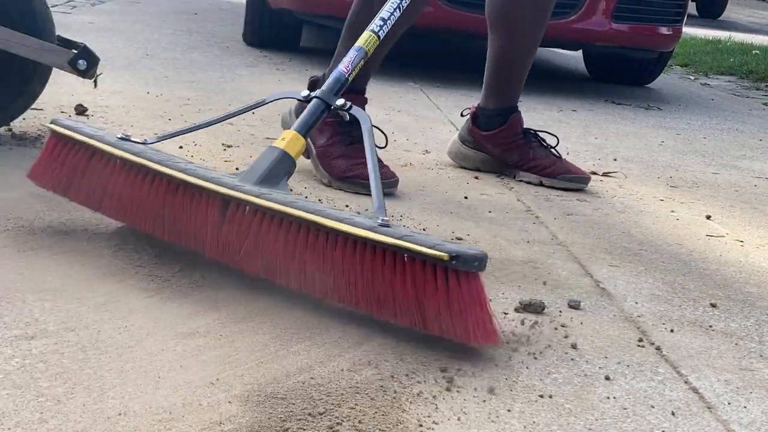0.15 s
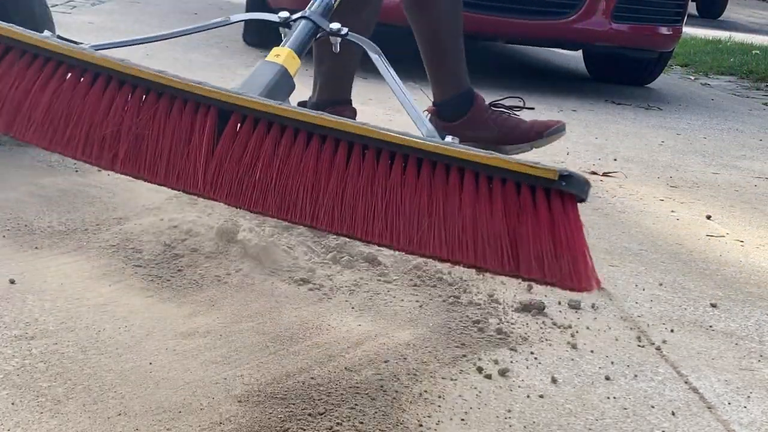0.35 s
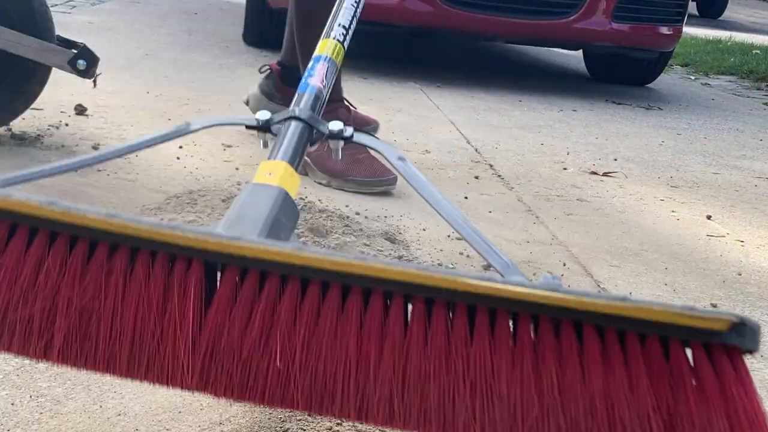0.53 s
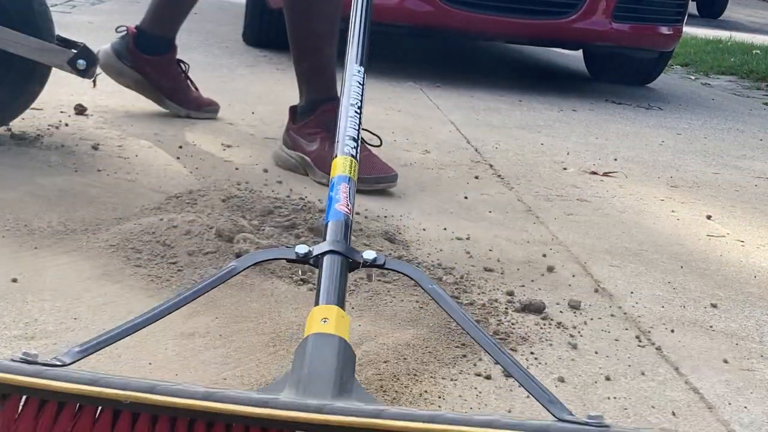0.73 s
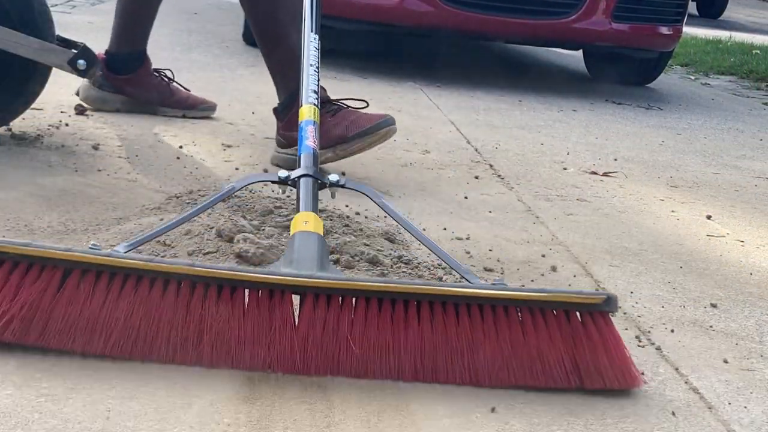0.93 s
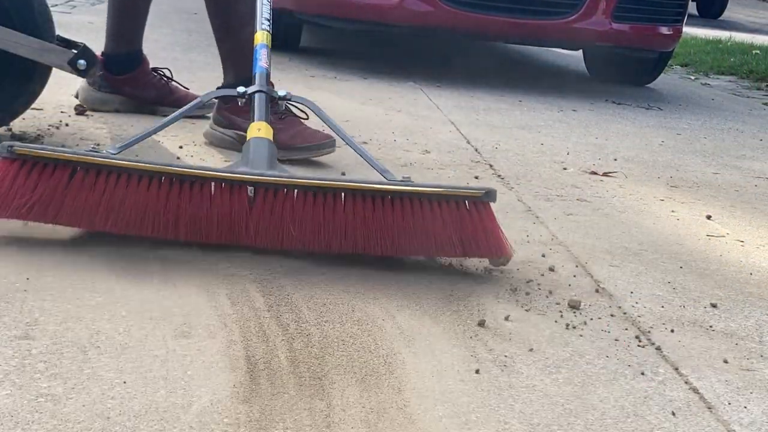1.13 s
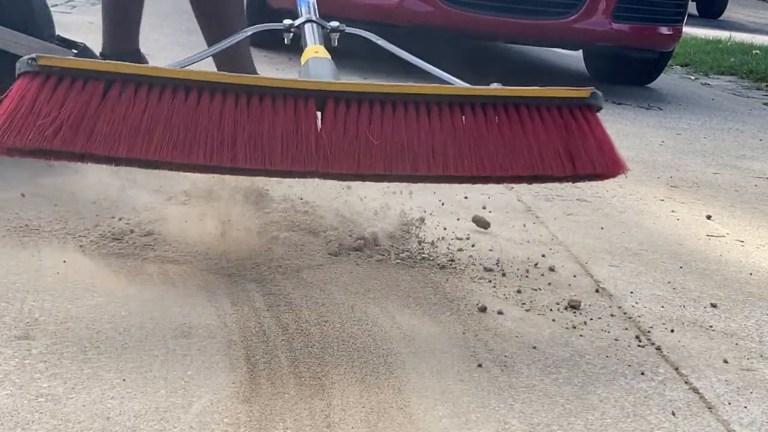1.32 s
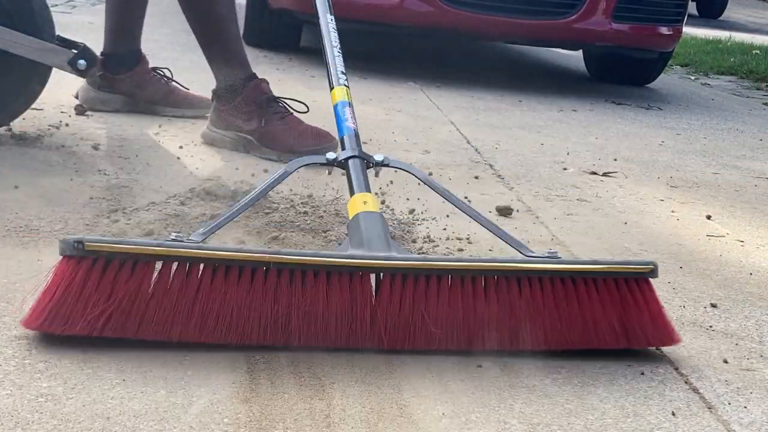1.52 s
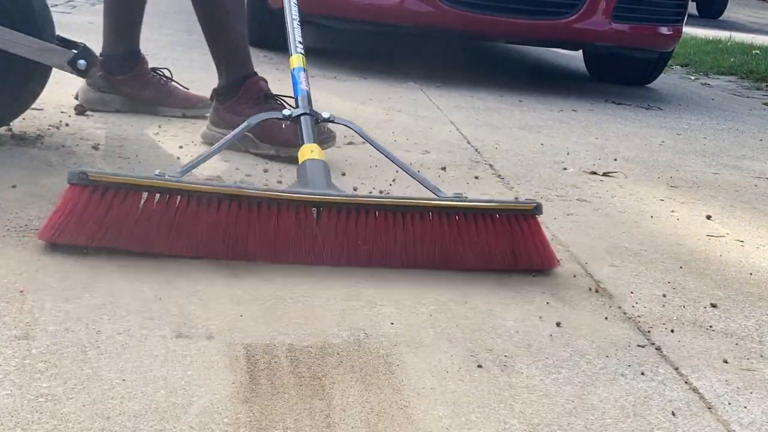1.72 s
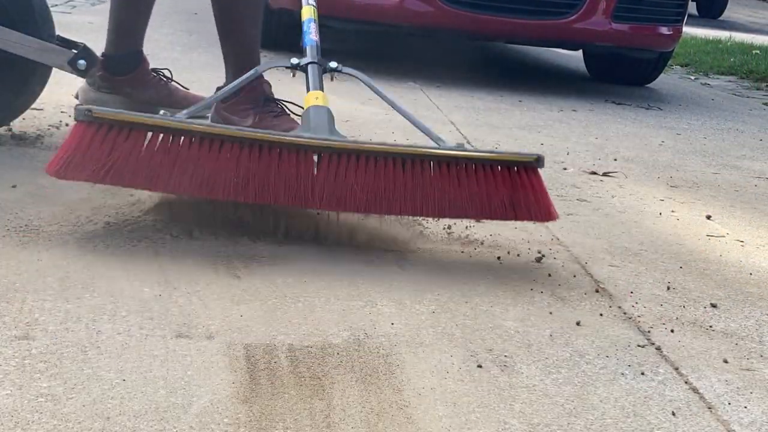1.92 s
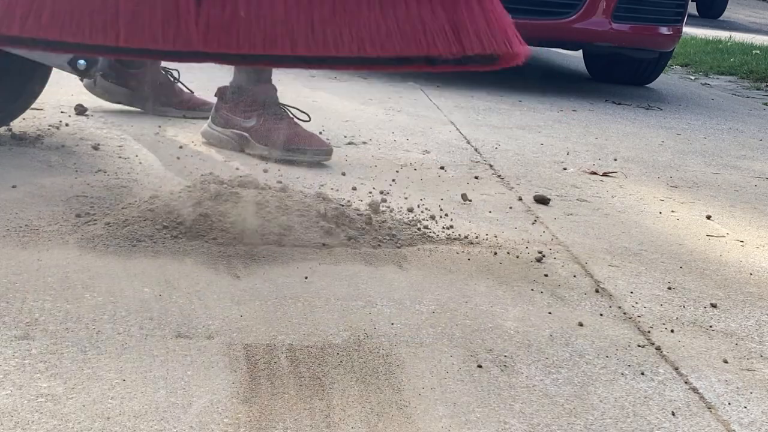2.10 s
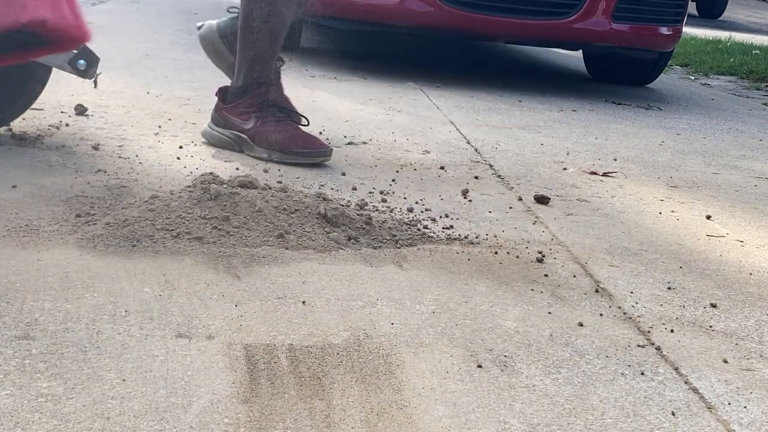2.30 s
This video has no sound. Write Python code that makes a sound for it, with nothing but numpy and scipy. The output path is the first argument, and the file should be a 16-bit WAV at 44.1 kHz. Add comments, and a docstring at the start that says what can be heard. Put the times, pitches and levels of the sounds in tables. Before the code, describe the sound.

A stiff push broom sweeps gritty soil on concrete, close up: a fading stroke end, then two slap-and-scrape strokes, with light soil patter, tiny pebble ticks and faint distant traffic outdoors, in close stereo.

```python
"""On a concrete driveway a stiff push broom sweeps soil: the end of one stroke, then two whole ones.
Bristle friction is dense random impulses shaped by a spectrum, with short rings of single bristles.
Each landing is a noise slap, decaying modes of the head and a low thud; flung soil is sparser impulses.
Shoes scuff, pebbles tick as brief damped modes, and distant traffic is shaped noise with a far whir
and a whistle. Two close microphone ports hear it, with a faint answer from the surroundings."""
import sys
import numpy as np
from scipy import signal
from scipy.fft import rfft, irfft, next_fast_len
from scipy.io import wavfile
from scipy.ndimage import uniform_filter1d, map_coordinates

SR = 44100
rng = np.random.default_rng(int(sys.argv[2]) if len(sys.argv) > 2 else 0)


def inscribe(sig):
    """Save sig as 16-bit PCM at rate SR to the path in sys.argv[1].

    A 1-D sig is mono; a 2-D sig holds one channel per row.
    Samples are clipped to [-1, 1] before scaling.
    """
    pcm = np.round(np.clip(np.atleast_2d(sig).T, -1, 1) * 32767)
    wavfile.write(sys.argv[1], SR, pcm.astype(np.int16))


N = 103811

# Push of the broom, one list per stroke: time_s, level_db
PUSH_STROKES = [
    [(0, -33.5), (.03, -36.5), (.076, -38), (.115, -51.5), (.17, -63.5), (.2, -90)],
    [(.695, -47.5), (.708, -45), (.725, -51), (.757, -45), (.778, -49.5), (.81, -31), (.83, -28),
     (.864, -33.5), (.9, -30.5), (1.0, -33.5), (1.074, -34), (1.1, -37.5), (1.13, -55), (1.22, -67),
     (1.25, -90)],
    [(1.597, -42.5), (1.612, -43), (1.632, -35), (1.68, -34), (1.718, -32.5), (1.792, -37), (1.805, -43.5),
     (1.87, -55.5), (1.96, -75)],
]
# Spectrum of bristles on concrete: frequency_hz, relative_level_db_per_hz
BRISTLE_SPECTRUM = [(88, -37.5), (150, -16), (189, -10.5), (303, -5), (369, -11), (487, -8.5), (520, -15.5),
                    (644, -10.5), (734, -8.5), (938, -3), (1260, -9.5), (1610, -2), (2200, -5), (2590, -12),
                    (3250, -3.5), (4160, -5), (4820, -2.5), (5680, 0), (7500, -7), (9750, -30.5),
                    (16500, -120)]
# Spectrum of fine sand: frequency_hz, relative_level_db_per_hz
SAND_SPECTRUM = [(3000, -37.5), (4500, -29), (6500, -8.5), (8200, 0), (9600, 1), (11000, 0), (12200, 0),
                 (13800, -5.5), (15700, -6)]
# Likeness of left and right for broom, soil and shoes: frequency_hz, correlation (no unit)
BROOM_ALIKE = [(100, 0.92), (900, 0.97), (1350, 0.66), (1900, 1), (5500, 0.83), (7300, 1), (9500, 0.94),
               (15000, 1)]
# Spectrum of the street: frequency_hz, relative_level_db_per_hz
STREET_SPECTRUM = [(15, -40), (28, -28.5), (40, -12), (62, -3.5), (100, -7), (160, -13.5), (330, -21.5),
                   (650, -31), (1000, -34), (1800, -36.5), (2700, -42), (6000, -43), (8000, -48.5),
                   (11000, -59), (13000, -62.5), (15500, -72)]
# Likeness of left and right for the street: frequency_hz, correlation (no unit)
STREET_ALIKE = [(60, 1), (130, 0.9), (300, 0.74), (640, 0.1), (1400, 0.47), (3000, 0.92), (12000, 0.75)]
# A far, airy whistle rises: time_s, pitch_hz, level_db
WHISTLE_PATH = [(1.941, 2000, -90), (2.0, 2150, -73.5), (2.06, 2350, -73.5), (2.17, 2560, -74),
                (2.3, 2960, -89.5)]
# Flung soil lands: peak_s, rise_s, t60_s, level_db
SOIL_SHOWERS = [(.203, .014, 0.21, -49.5), (1.199, 0.061, .12, -42.5), (1.84, 0.027, 0.16, -55.5)]
# Spectrum of soil and soles: frequency_hz, relative_level_db_per_hz
SOIL_SPECTRUM = [(150, -21.5), (400, -2.5), (850, 0.5), (1150, -3.5), (1800, 2), (2700, -3), (3500, -2.5),
                 (5200, -3), (7500, -12), (11000, -15.5), (15500, -27.5)]
# Pebbles tick: start_s, level_db, pitch_hz
PEBBLE_TICKS = [(.261, -56, 3500), (.371, -59, 4170), (1.343, -54.5, 3100), (1.998, -52, 4100),
                (2.223, -48, 1750), (2.2231, -59, 8500)]
# Modes of a pebble: multiple_of_pitch (no unit), level_db
PEBBLE_MODES = [(.8, -5), (1, 0), (1.24, -3), (2.7, -13.5)]
# Shoe scuffs: peak_s, rise_s, t60_s, sole_db, sand_db
SHOE_SCUFFS = [(.357, 0.016, 0.13, -59, -88), (.416, .018, .03, -59.5, -66), (2.16, 0.047, 0.77, -70, -84)]
# The head lands: start_s, slap_db, knock_delay_s, knock_db, knock_pitch_ratio (no unit), thud_db
HEAD_LANDINGS = [(0.6936, -23, 0.0022, -33, 1.05, -42), (1.5972, -33.5, .006, -28, .94, -39)]
# Spectrum of the slap: frequency_hz, relative_level_db_per_hz
SLAP_SPECTRUM = [(200, -9), (600, 3), (950, 6), (1700, 0), (2500, -1.5), (4500, 2.5), (7000, -1.5),
                 (11000, -7.5), (15500, -14)]
# Modes of the broom head before the pitch ratio: frequency_hz, level_db, t60_s
HEAD_MODES = [(165, -2.5, .035), (258, -3, .03), (540, 0, .025), (820, -3.5, .025), (1000, -1.5, .025),
              (2390, -14, 0.034)]
# Phase between the ports: frequency_hz, left_lead_rad
PORT_PHASE = [(20, 0), (2700, 0), (5000, -.6), (6300, -.6), (7000, 0), (8050, .2), (8300, 3.1), (8900, 3.3),
              (10000, 4.8), (10900, 6.2), (11500, 6.4), (13400, 9.3), (14000, 9.8), (15500, 12.5)]

LOUD_DB = -33  # level of a full push
# Each band: level at a full push, and growth in dB per dB of push
BODY_DB, BODY_GROWS = -7.5, 0.8  # low rasp
RASP_DB, RASP_GROWS = -3, 1.11  # high rasp
SIZZLE_DB, SIZZLE_GROWS = -1, 1.07  # sand
SPLIT_HZ = 2760  # between low and high rasp
FLICKS_PER_S, FLICK_SPREAD_DB, CHATTER_DB = 24000, 4, 0.62
TWANG_PER_S, TWANG_HZ, TWANG_OCTAVES = 300, 7310, 1.5  # rate, middle pitch, whole pitch range
TWANG_CYCLES, TWANG_DB = 110, -10.5  # decay constant of the ring; level at a full push
PATCHY_DB = 1.46  # spread of the random gain patches in the scrape's colour
STREET_DB, STREET_SWELL_DB = -51, -2.5
WHIR_HZ, WHIR_WIDTH_HZ, WHIR_DB = 1470, 260, -75
WHISTLE_WIDTH_HZ = 260
SETTLE_DB, SETTLE_T60_S = -15.5, 0.53  # rolling crumbs, relative to their shower
PEBBLE_RISE_S, PEBBLE_T60_S = 0.00022, 0.013
SLAP_RISE_S, SLAP_T60_S = 0.0011, 0.026
THUD_HZ, THUD_PEAK_S, THUD_RISE_S, THUD_T60_S = 69, .024, .01, .13  # peak counts from the landing
YARD_DB, YARD_START_S, YARD_RISE_S, YARD_T60_S = -24, .008, 0.00504, 0.16
LEFT_DB = .2  # the left gains this, the right loses it
LOW_CUT_HZ, TOP_HZ = 36, 15750


def amp(db):
    """Level law: decibels to amplitude ratio."""
    return 10 ** (np.asarray(db) / 20)


def unit(x):
    """Normalization: scale to rms 1."""
    return x / np.sqrt(np.mean(x ** 2) + 1e-20)


def clock():
    """Sampling: the time of each sample in seconds."""
    return np.arange(N) / SR


def along(points, hz):
    """Interpolation of (frequency, value) points on a logarithmic frequency axis."""
    f, v = np.transpose(points)
    return np.interp(np.log(hz + 1), np.log(f + 1), v)


def wobble(rate):
    """Random modulation: a smooth curve through Gaussian knots, rate of them a second."""
    knots = rng.standard_normal(int(N * rate / SR) + 4)
    return map_coordinates(knots, [clock() * rate])


def filtered(x, response):
    """Linear filtering: the signal's spectrum times a frequency response."""
    m = next_fast_len(N + SR // 2)
    return irfft(rfft(x, m) * response(np.fft.rfftfreq(m, 1 / SR)), m)[..., :N]


def stereo(pair, spectrum, alike):
    """Partial correlation: two unrelated signals mix into a coloured left and right of rms 1."""
    def mid_side(hz):
        turn = np.arccos(np.clip(along(alike, hz), -1, 1)) / 2
        return amp(along(spectrum, hz)) * [np.cos(turn), np.sin(turn)]

    mid, side = filtered(pair, mid_side)
    return unit(np.array([mid + side, mid - side]))


def grit(spectrum, per_s, spread_db):
    """Granular contact: random impulses of uneven size and sign, filtered to a spectrum."""
    hit = rng.random((2, N)) < per_s / SR
    size_db = spread_db * np.clip(rng.standard_normal((2, N)), -3, 2.5)
    sign = rng.choice([-1, 1], (2, N))
    return stereo(hit * amp(size_db) * sign, spectrum, BROOM_ALIKE)


def strike(s, rise, t60):
    """Impact envelope: a fast rise from s, then exponential decay."""
    t = np.maximum(clock() - s, 0)
    return (1 - np.exp(-t / rise)) * amp(-60 * t / t60)


def swell(s, rise, t60):
    """Gathering envelope: a Gaussian rise to a peak at s, then exponential decay."""
    t = clock() - s
    gather = np.exp(-(np.minimum(t, 0) / rise) ** 2 / 2)
    return gather * amp(-60 * np.maximum(t, 0) / t60)


def patchy(x):
    """Time-frequency modulation: random gain patches, some hundred Hz by some hundredths of a second."""
    z = signal.stft(x, nperseg=512)[2]
    field = rng.standard_normal(z.shape[1:])
    field = uniform_filter1d(field, size=6, axis=0)
    field = uniform_filter1d(field, size=8, axis=1)
    return unit(signal.istft(z * amp(PATCHY_DB * unit(field)), nperseg=512)[1][:, :N])


def twangs():
    """Free vibration: single bristles spring loose and ring briefly, each at its own pitch."""
    count = int(TWANG_PER_S * N / SR)
    when, pitch, size = rng.random((count, 3)).T[:, :, None]
    hz = TWANG_HZ * 2 ** (TWANG_OCTAVES * (pitch - .5))
    t = np.arange(SR // 20) / SR
    rings = size ** 2 * np.sin(2 * np.pi * hz * t) * np.exp(-hz * t / TWANG_CYCLES)
    places = (when * N).astype(int) + np.arange(len(t))
    return unit(np.bincount(places.ravel(), rings.ravel(), minlength=N)[:N])


def bristles():
    """Friction: bristles drag grit over concrete; a harder push is louder and brighter."""
    push = sum(amp(np.interp(clock(), *np.transpose(rows), left=-140, right=-140))
               for rows in PUSH_STROKES)
    push = push / amp(LOUD_DB) * amp(CHATTER_DB * wobble(90))
    rasp = patchy(grit(BRISTLE_SPECTRUM, FLICKS_PER_S, FLICK_SPREAD_DB))
    low = filtered(rasp, lambda hz: 1 / (1 + (hz / SPLIT_HZ) ** 4))
    sand = patchy(grit(SAND_SPECTRUM, FLICKS_PER_S, FLICK_SPREAD_DB))
    body = amp(BODY_DB) * push ** BODY_GROWS * unit(low)
    high = push ** RASP_GROWS * (amp(RASP_DB) * unit(rasp - low) + amp(TWANG_DB) * twangs())
    sizzle = amp(SIZZLE_DB) * push ** SIZZLE_GROWS * sand
    return amp(LOUD_DB) * (body + high + sizzle)


def narrow(hz, width_hz):
    """Narrow-band noise: random modulation of two quadrature carriers, rms 1 around hz."""
    turn = 2 * np.pi * np.cumsum(hz * np.ones(N)) / SR
    return unit(wobble(width_hz) * np.cos(turn) + wobble(width_hz) * np.sin(turn))


def street():
    """Broadband noise of distant traffic, with narrow-band noise for a steady whir and rising whistle."""
    noise = stereo(rng.standard_normal((2, N)), STREET_SPECTRUM, STREET_ALIKE)
    rumble = amp(STREET_DB + STREET_SWELL_DB * wobble(6.87)) * noise
    whir = amp(WHIR_DB) * narrow(WHIR_HZ, WHIR_WIDTH_HZ)
    s, hz, db = np.transpose(WHISTLE_PATH)
    level = amp(np.interp(clock(), s, db, left=-140, right=-140))
    whistle = level * narrow(np.interp(clock(), s, hz), WHISTLE_WIDTH_HZ)
    return rumble + whir + whistle


def soil():
    """Many small impacts: soil thrown ahead patters onto the heap, and sparser crumbs roll on."""
    fall = sum(amp(db) * swell(s, rise, t60) for s, rise, t60, db in SOIL_SHOWERS)
    roll = sum(amp(db + SETTLE_DB) * swell(s, rise, SETTLE_T60_S) for s, rise, _, db in SOIL_SHOWERS)
    patter = grit(SOIL_SPECTRUM, per_s=13000, spread_db=4.5)
    crumbs = grit(SOIL_SPECTRUM, per_s=2200, spread_db=6)
    return fall * patter + roll * crumbs


def pebbles():
    """Impact on a stiff body: stray pebbles tick on the slab as heavily damped modes."""
    out = np.zeros(N)
    for s, db, hz in PEBBLE_TICKS:
        ring = sum(amp(mode_db) * np.sin(2 * np.pi * k * hz * (clock() - s))
                   for k, mode_db in PEBBLE_MODES if k * hz < TOP_HZ)
        out += amp(db) * strike(s, PEBBLE_RISE_S, PEBBLE_T60_S) * ring
    return out


def shoes():
    """Sliding friction: soles scuff on the sandy concrete."""
    sole = grit(SOIL_SPECTRUM, FLICKS_PER_S, FLICK_SPREAD_DB)
    sand = grit(SAND_SPECTRUM, FLICKS_PER_S, FLICK_SPREAD_DB)
    return sum(swell(s, rise, t60) * (amp(sole_db) * sole + amp(sand_db) * sand)
               for s, rise, t60, sole_db, sand_db in SHOE_SCUFFS)


def landings():
    """Impact and resonance: bristle tips slap, head modes knock, and the springy bristles give a thud."""
    out = np.zeros((2, N))
    tips = stereo(rng.choice([-1., 1.], (2, N)), SLAP_SPECTRUM, BROOM_ALIKE)
    for s, slap_db, delay, knock_db, ratio, thud_db in HEAD_LANDINGS:
        t = clock() - s - delay
        slap = strike(s, SLAP_RISE_S, SLAP_T60_S) * tips
        knock = sum(amp(db) * strike(s + delay, .0005, t60) * np.sin(2 * np.pi * ratio * hz * t)
                    for hz, db, t60 in HEAD_MODES)
        # the broom rocks on its bristles, deepest a moment after landing
        thud = swell(s + THUD_PEAK_S, THUD_RISE_S, THUD_T60_S) * np.sin(2 * np.pi * THUD_HZ * t)
        out += amp(slap_db) * slap + amp(knock_db) * knock + amp(thud_db) * thud
    return out


def yard(x):
    """Diffuse reflection: a decaying noise response for the house and the parked cars."""
    tail = rng.standard_normal((2, N)) * strike(YARD_START_S, YARD_RISE_S, YARD_T60_S)
    return signal.fftconvolve(x, tail / np.linalg.norm(tail[0]), axes=1)[:, :N]


def scene():
    """Superposition: all sources add, and the treble reaches the two ports out of step."""
    near = bristles() + soil() + pebbles() + shoes() + landings()
    half_turns = np.array([[.5j], [-.5j]])  # half the phase lead to each port
    ports = filtered(near + street(), lambda hz: np.exp(half_turns * along(PORT_PHASE, hz)))
    return (ports + amp(YARD_DB) * yard(near)) * amp([[LEFT_DB], [-LEFT_DB]])


def record(dry):
    """Band limiting: a steep low cut against deep rumble and a sharp upper edge."""
    def band(hz):
        low_cut = (hz / LOW_CUT_HZ) ** 4 / np.sqrt(1 + (hz / LOW_CUT_HZ) ** 8)
        return low_cut * (.5 - .5 * np.tanh((hz - TOP_HZ) / 60))

    return filtered(dry, band)


dry = scene()
out = record(dry)
inscribe(out)
```